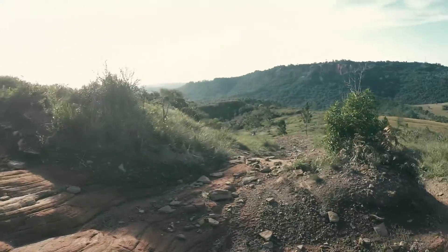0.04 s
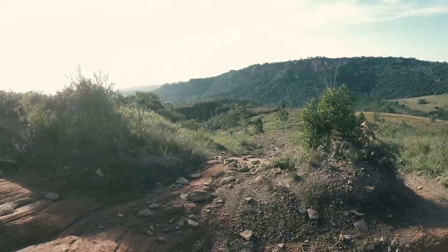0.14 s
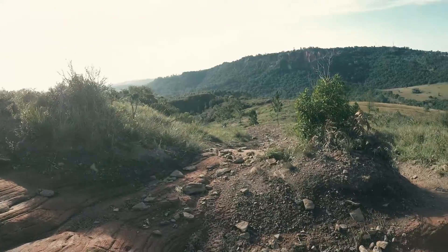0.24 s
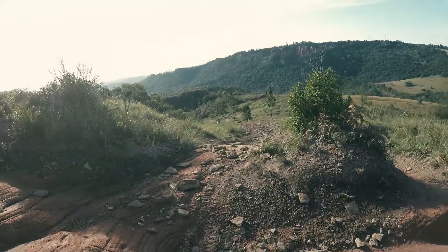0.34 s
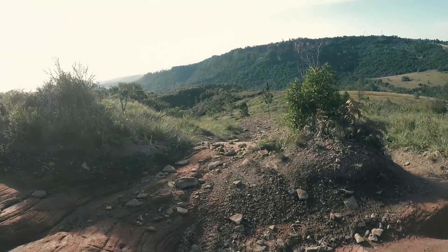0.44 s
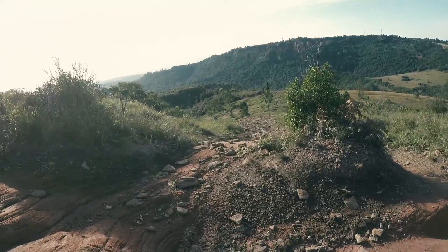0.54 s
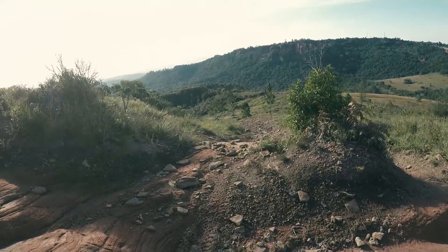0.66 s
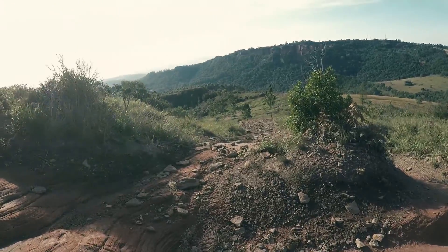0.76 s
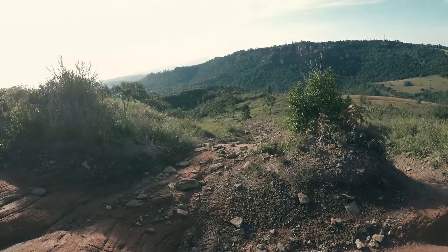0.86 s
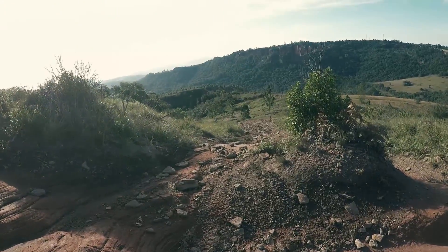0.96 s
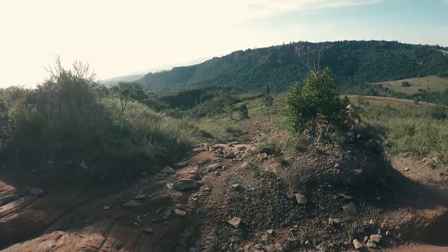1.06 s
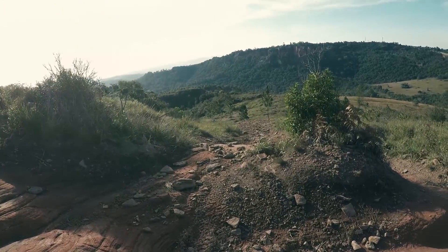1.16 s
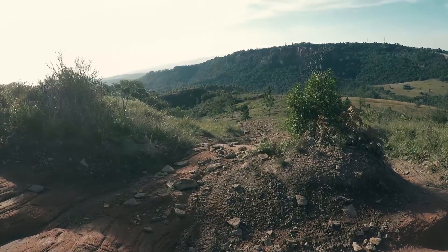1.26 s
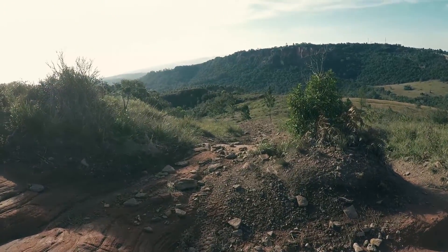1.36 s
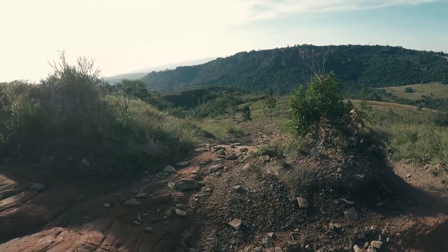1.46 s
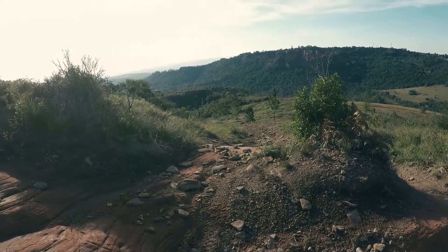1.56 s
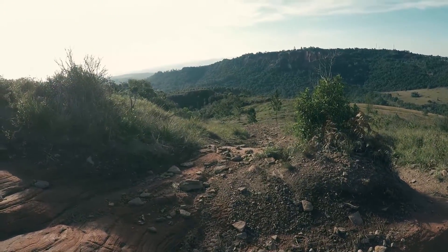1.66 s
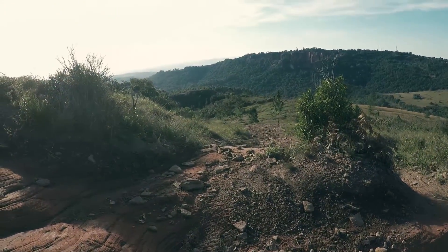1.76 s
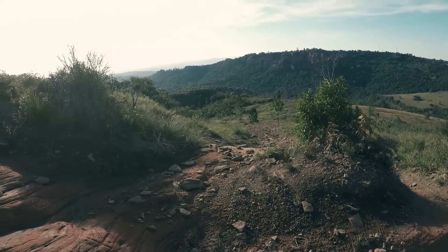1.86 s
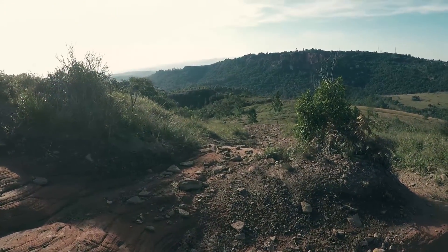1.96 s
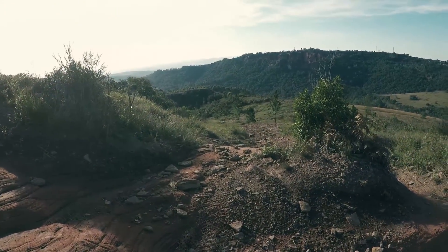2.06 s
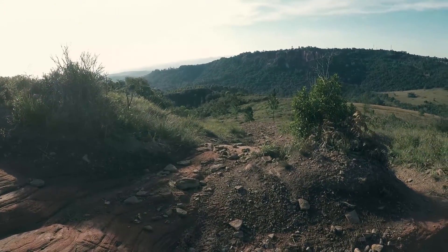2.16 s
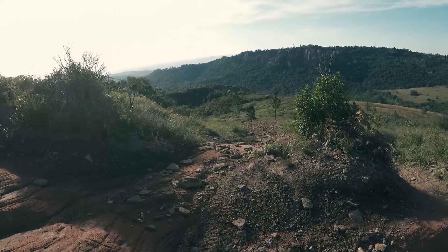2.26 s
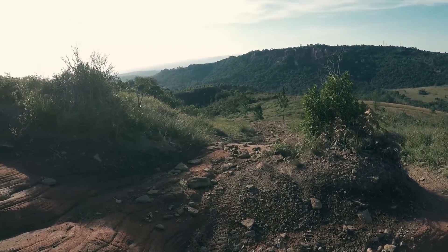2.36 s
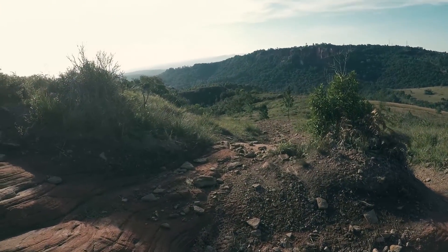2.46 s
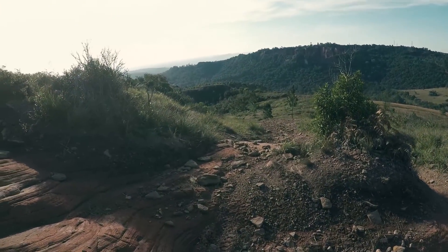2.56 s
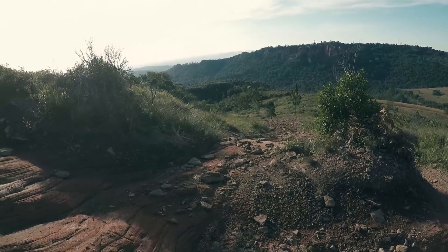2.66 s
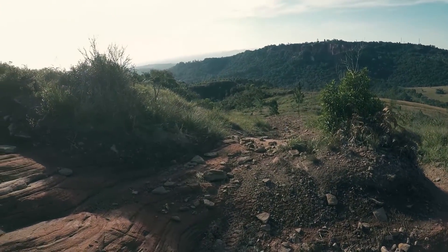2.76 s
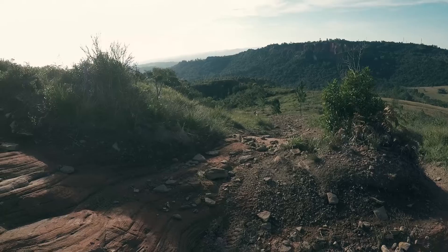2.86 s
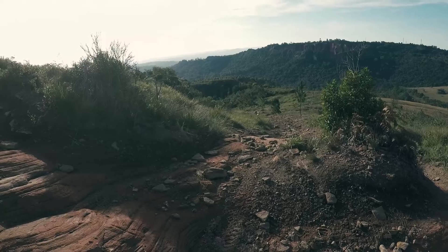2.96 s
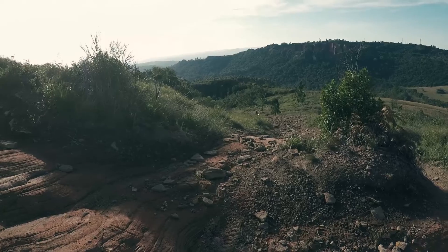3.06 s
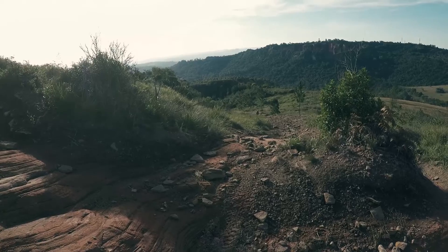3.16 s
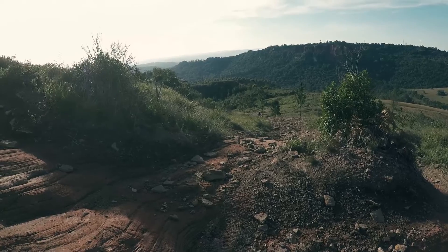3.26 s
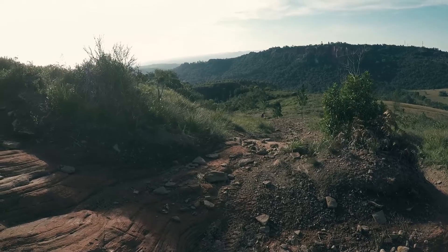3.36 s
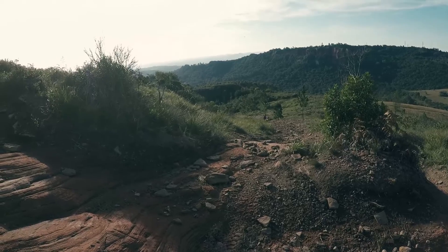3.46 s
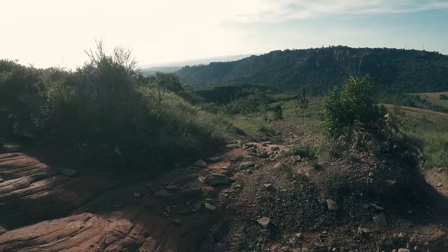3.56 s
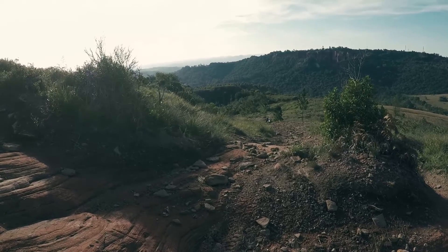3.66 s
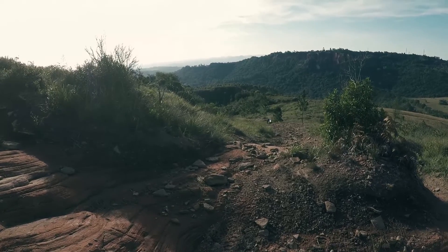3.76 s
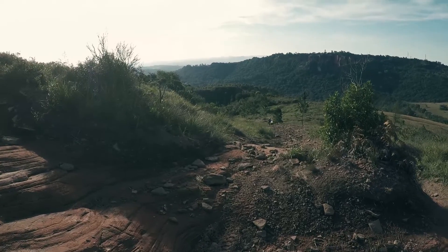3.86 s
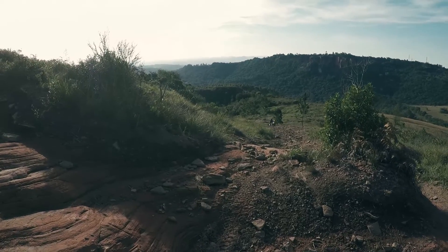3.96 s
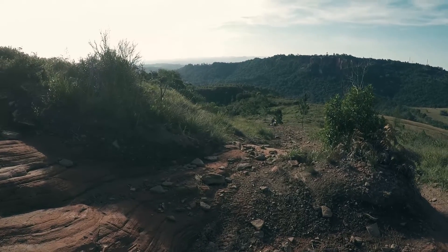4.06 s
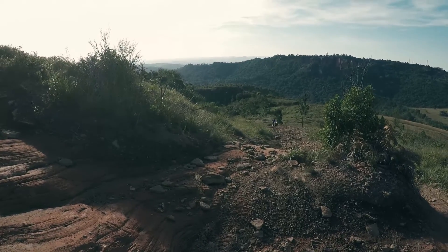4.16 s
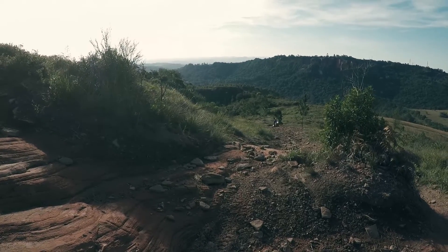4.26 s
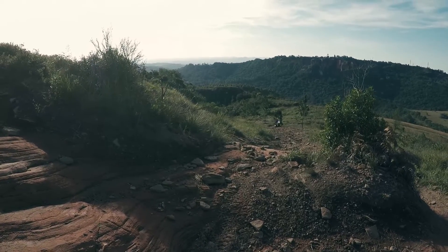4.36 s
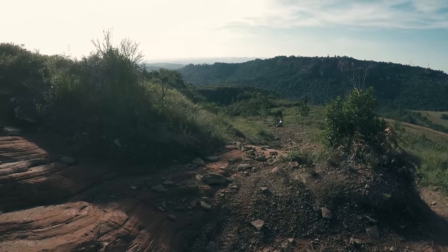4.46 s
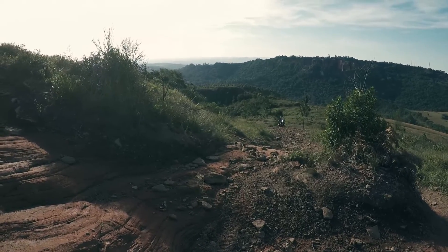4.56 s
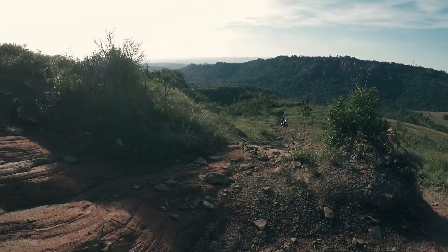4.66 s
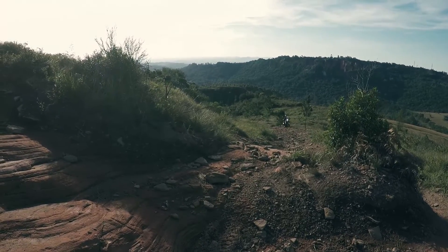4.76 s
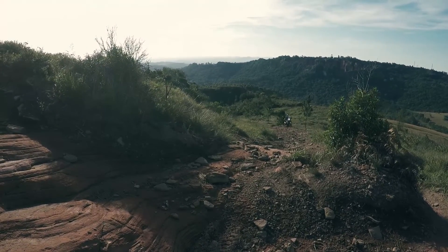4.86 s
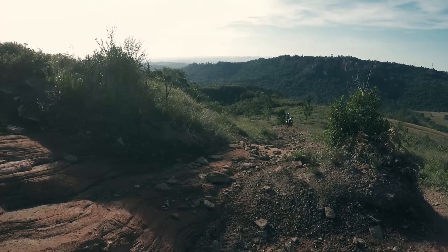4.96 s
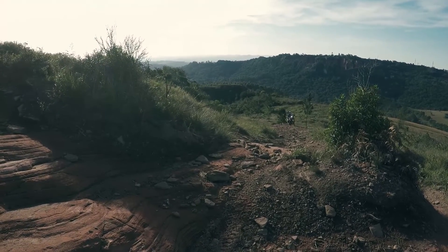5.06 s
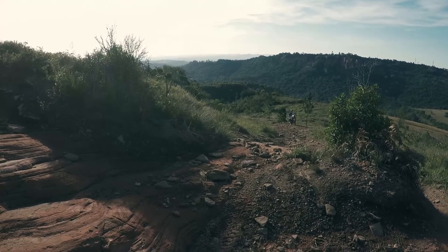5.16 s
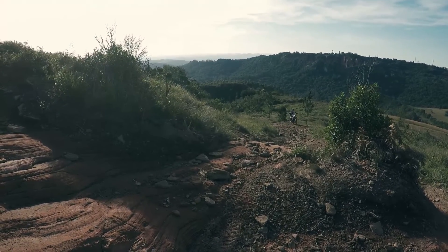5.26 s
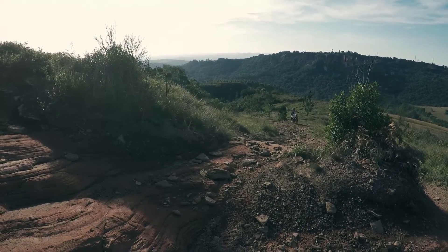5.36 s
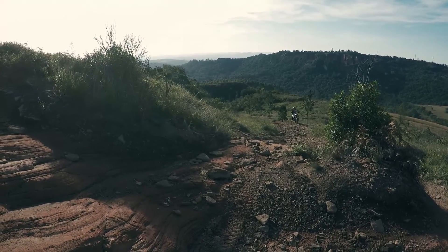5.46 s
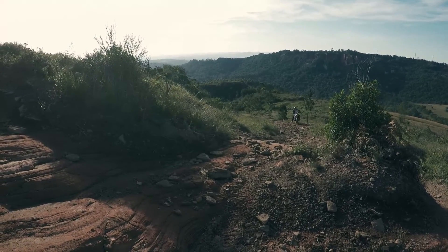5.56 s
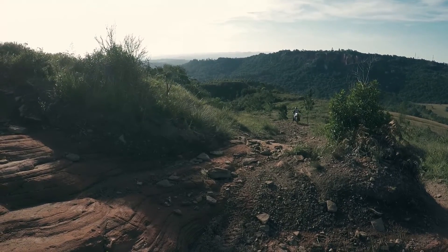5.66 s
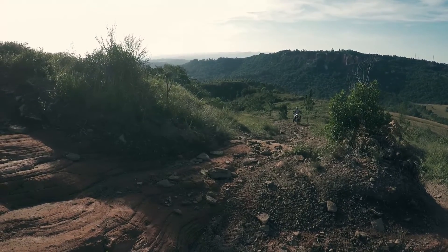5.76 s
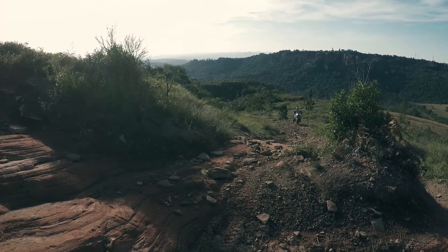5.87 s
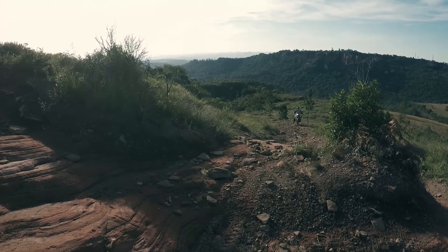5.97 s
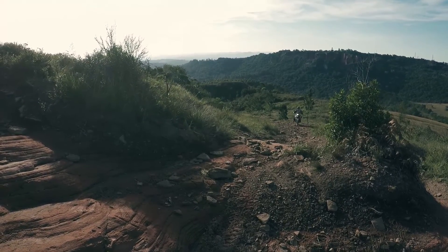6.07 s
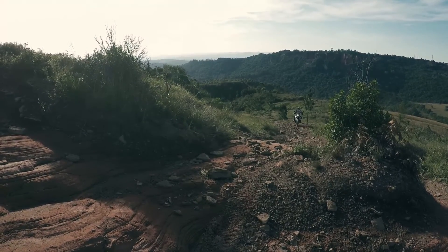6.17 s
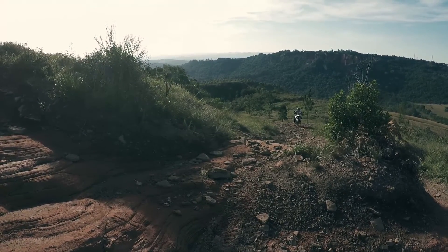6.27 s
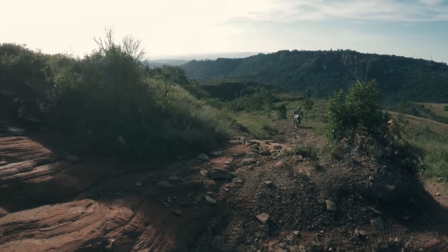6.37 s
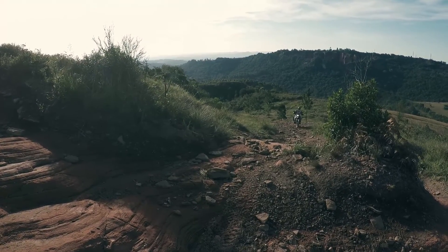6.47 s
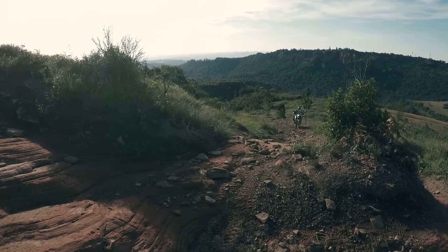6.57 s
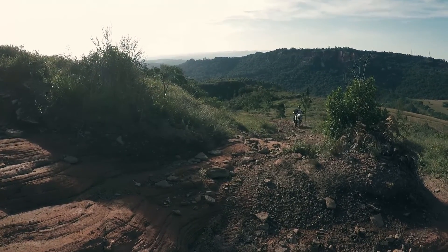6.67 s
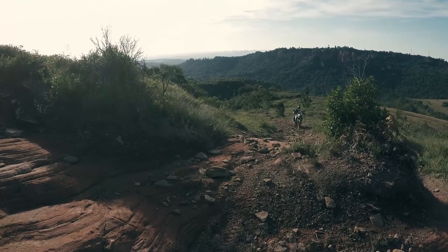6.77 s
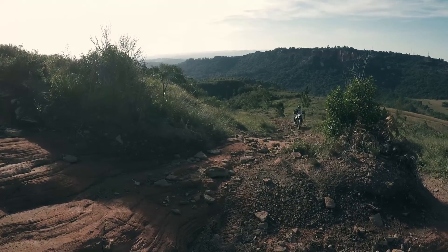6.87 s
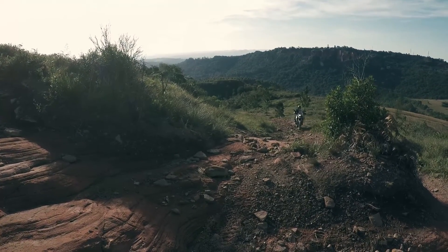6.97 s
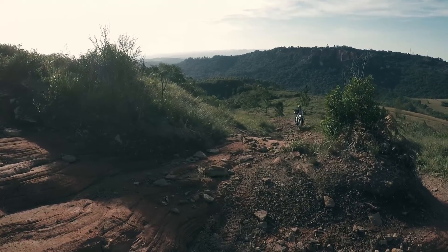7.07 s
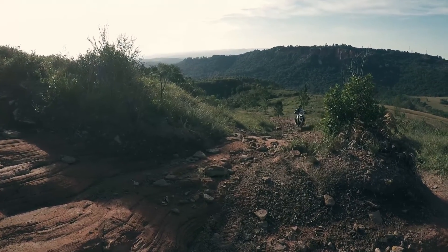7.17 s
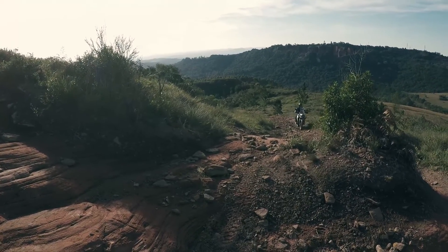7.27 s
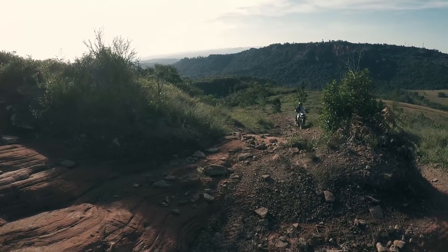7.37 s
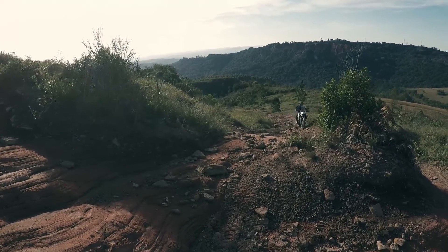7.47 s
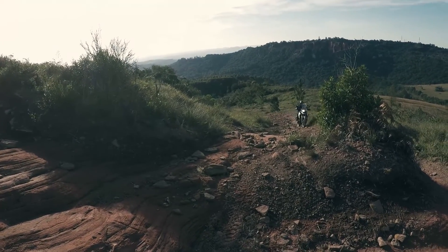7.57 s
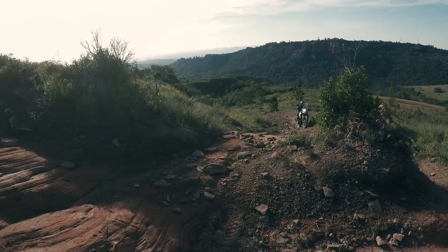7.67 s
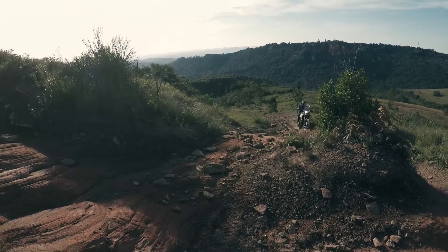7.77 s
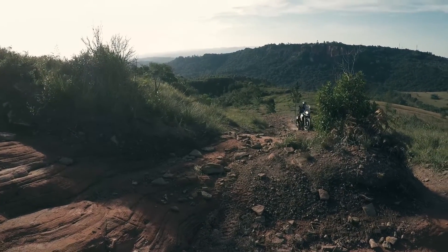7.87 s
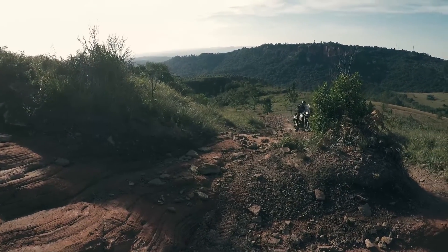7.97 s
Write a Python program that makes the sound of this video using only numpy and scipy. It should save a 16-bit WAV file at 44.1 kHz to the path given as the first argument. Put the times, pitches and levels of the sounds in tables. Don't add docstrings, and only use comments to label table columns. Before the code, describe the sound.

A single-cylinder trail motorcycle thumps up a rocky slope toward the listener, growing louder, with stones clicking and knocking late on.

```python
import sys
import numpy as np
from scipy import signal
from scipy.fft import rfft, irfft, next_fast_len
from scipy.io import wavfile
from scipy.ndimage import uniform_filter1d

SR = 44100
rng = np.random.default_rng(int(sys.argv[2]) if len(sys.argv) > 2 else 0)


def to_wav(sig):
    pcm = np.clip(np.atleast_2d(sig), -1, 1) * 32767
    pcm = np.round(pcm).astype(np.int16)
    wavfile.write(sys.argv[1], SR, pcm.T)


def boost_factor(decibels):
    exponent = np.asarray(decibels, float) / 20
    return 10 ** exponent


N = 353682
PADDED = next_fast_len(N + 2048)
FFT_HZ = np.arange(PADDED // 2 + 1) * SR / PADDED

# (f/Hz, width/Hz, level/dB)
BODY_MODES = [(886, 220, 4), (1272, 160, 4), (1783, 510, 4.5), (3180, 325, 6), (3220, 180, -5.5),
              (3935, 414, 1), (4880, 560, 0), (6150, 494, 1), (7270, 1150, -6.5), (9820, 980, -13),
              (13000, 1500, -31)]


def rms_one(x):
    return x / np.sqrt(np.mean(x ** 2) + 1e-20)


def in_time(rows):
    s, *columns = np.transpose(rows)
    return [np.interp(np.arange(N) / SR, s, c) for c in columns]


def swells(rows):
    s = np.arange(0, N / SR + .002, .001)
    total = sum(height * np.clip(1 - abs(s - t) / half, 0, 1) for t, height, half in rows)
    return np.interp(np.arange(N) / SR, s, total)


def at_hz(points):
    hz, value = np.transpose(points)
    return np.interp(np.log(FFT_HZ + 1), np.log(np.maximum(hz, 0) + 1), value)


def shaped(x, response):
    return irfft(rfft(x, PADDED) * response, PADDED)[..., :N]


def cut(x, hz, kind, order=2):
    return signal.sosfilt(signal.butter(order, hz, kind, fs=SR, output="sos"), x)


def drift(rate_hz):
    slow = cut(rng.standard_normal(N // 50 + 1002), 50 * rate_hz, "low")
    slow = rms_one(slow[1000:])
    return np.interp(np.arange(N) / 50, np.arange(len(slow)), slow)


def resonances(x, modes):
    out = 0
    for hz, width, level_db in modes:
        r = np.exp(-np.pi * width / SR)
        zeros = (1 - r * r) / 2 * np.array([1, 0, -1])
        poles = [1, -2 * r * np.cos(2 * np.pi * hz / SR), r * r]
        out = out + boost_factor(level_db) * signal.lfilter(zeros, poles, x + 1e-18)
    return out


def two_ports(first, second):
    # (f/Hz, likeness [0-1])
    likeness = [(30, 0.81), (150, 0.94), (350, 0.68), (1000, 0.35), (3000, 0.71), (5500, 0.87), (9000, 0),
                (14000, 0.25)]
    alike = np.clip(at_hz(likeness), 0, 1)
    right = shaped([first, second], [alike, np.sqrt(1 - alike ** 2)]).sum(axis=0)
    return np.array([first, right])


def engine_revs():
    # (t/s, rate/firings per s)
    pace = [
        (0.0, 43.4),
        (2.0, 40.4),
        (4.0, 39.6),
        (5.3, 35.1),
        (6.4, 42.2),
        (8.02, 41.7),
    ]
    # (t/s, gain/firings per s, half length/s)
    slips = [(0.25, 3.5, 0.05), (0.69, 3.7, 0.05), (0.89, 6.1, 0.21), (1.01, 3.2, 0.07), (1.35, 3.5, 0.06),
             (1.96, 4.4, 0.11), (2.32, 3.9, 0.09), (2.44, 12.3, 0.22), (2.53, 9.2, 0.07),
             (3.02, 13.2, 0.12), (3.54, 11.2, 0.23), (3.62, 6.1, 0.05), (3.82, 13.4, 0.09),
             (4.07, 4.7, 0.09), (4.28, 30.0, 0.19), (4.54, 7.5, 0.15), (4.86, 8.2, 0.08), (5.01, 4.1, 0.06),
             (5.37, 4.1, 0.06), (5.72, 13.5, 0.2), (6.13, 6.6, 0.16), (6.3, 6.2, 0.07), (6.52, 6.4, 0.08),
             (6.79, 14.9, 0.12), (7.39, 9.2, 0.13), (7.62, 21.0, 0.13), (7.68, 5.3, 0.06),
             (7.92, 11.5, 0.12)]
    # (t/s, change/firings per s, half length/s)
    bites = [(0.4, -2.4, 0.06), (1.17, -4.3, 0.14), (1.41, -4.3, 0.05), (1.78, -6.6, 0.09),
             (2.21, -2.0, 0.19), (2.42, -11.0, 0.06), (2.77, -4.1, 0.1), (3.59, -6.3, 0.05),
             (5.11, -4.1, 0.05), (5.28, -3.3, 0.06), (5.46, -5.8, 0.06), (5.81, -6.2, 0.06),
             (6.04, -11.0, 0.11), (6.8, -10.5, 0.17), (7.05, -4.6, 0.06), (7.33, -10.2, 0.15),
             (7.62, -10.4, 0.05)]
    return in_time(pace)[0] + swells(slips) + swells(bites)


def exhaust(turns, per_s, pulse_db, gas_db):
    # (f/Hz, level of a firing order passing there/dB)
    pipe = [(38, -7), (64, -1), (86, 2), (125, -0.5), (162, 0.5), (192, -13), (228, -6), (330, -28.5)]
    # (f/Hz, width/Hz, level/dB)
    silencer = [(273, 240, 1.5), (326, 97, -2), (466, 103, 3)]
    pipe_hz, pipe_level = np.transpose(pipe)
    turns = turns + .02 * drift(14)
    uneven_db = 1.2 * drift(18)
    thump = 0
    for k in range(1, 11):
        order_db = np.interp(np.log(k * per_s), np.log(pipe_hz), pipe_level)
        gain = boost_factor(order_db + 2.0 * drift(10) + uneven_db)
        waver = .09 * k * drift(8)
        apart = .16 * drift(5) * [[1], [-1]]
        lag = .36 * (k - 3) ** 2
        thump = thump - gain * np.cos(2 * np.pi * k * turns - lag + waver + apart)
    thump = thump / np.sqrt(uniform_filter1d(np.mean(thump ** 2, axis=0), size=SR // 8) + 1e-20)
    puff = np.exp(-.6 * (turns % 1))
    gas = resonances(puff * rng.standard_normal((2, N)), silencer)
    gas = cut(gas, 669, "low", order=4)
    return boost_factor(pulse_db + 1.0) * thump + boost_factor(gas_db - 0.5) * two_ports(*gas / gas.std())


def rattle(turns, level_db):
    ticks_per_s, beat_depth, tick_share = 250, 0.044, 0.31
    beat = 1 + beat_depth * np.cos(2 * np.pi * turns)
    ticks = (rng.random(N) < ticks_per_s / SR) * boost_factor(4.0 * np.minimum(rng.exponential(1, N), 3))
    ticks = signal.lfilter([1], [1, -.97], ticks)
    shake = rng.standard_normal((2, N)) * (beat + tick_share * ticks)
    hiss = 0
    for k, mode in enumerate(BODY_MODES):
        flicker = boost_factor(1.72 * drift(17.8))
        sign = (-1) ** (k - (k > 3))
        ring = resonances(resonances(shake, [mode]), [(mode[0], 4.5 * mode[1], 0)])
        hiss = hiss + flicker * sign * ring
    return boost_factor(level_db - 1.0) * two_ports(*hiss / cut(hiss, [2800, 7000], "band").std())


def gravel():
    # (t/s, peak level/dB, half length/s)
    scrabbles = [(2.17, -49, .07), (2.6, -49, .2), (4.55, -48.5, .25), (4.997, -46, 0.17),
                 (5.732, -40.5, 0.23), (6.205, -40.5, 0.24), (7.05, -50, .12), (7.5, -49, 0.11),
                 (7.703, -37.5, 0.17), (7.928, -36.5, .12)]
    grains_per_s = 320
    grains = (rng.random(N) < grains_per_s / SR) * boost_factor(3.5 * np.minimum(rng.exponential(1, N), 4))
    crunch = rng.standard_normal((2, N)) * (0.3 + signal.lfilter([1], [1, -.985], grains))
    crunch = cut(crunch, [477, 1350], "band")
    level = swells([(t, boost_factor(peak_db), half) for t, peak_db, half in scrabbles])
    return level * two_ports(*crunch / crunch.std())


def contacts():
    # (t/s, peak level/dB, brightest f/Hz)
    grit = [(0.4609, -36, 4170), (1.0856, -38, 3150), (2.334, -31, 6150), (2.437, -35, 5640),
            (2.493, -31, 5700), (2.791, -40, 4570), (3.0061, -33.5, 3720), (5.446, -32, 3250),
            (5.5358, -26.5, 3600), (5.5692, -19, 3800), (5.6186, -29, 3100), (5.6446, -25, 4120),
            (5.9233, -23.5, 3480), (6.725, -29, 3230), (6.787, -29, 3240), (6.8547, -25, 3900),
            (6.8625, -13, 1970), (6.8670, -16, 3800), (6.879, -29, 3880), (6.9013, -20.5, 3200),
            (7.1423, -30, 3180), (7.6643, -17.5, 5740)]
    # (t/s, peak level/dB, brightest f/Hz)
    chips = [(4.2921, -30, 3160), (5.368, -40, 3180), (6.691, -22, 4640), (6.8, -23, 3150),
             (7.3607, -25, 3890), (7.3848, -31, 3180), (7.503, -24.5, 3280), (7.623, -22.5, 5860),
             (7.988, -24.5, 3850)]
    # (t/s, peak level/dB, brightest f/Hz, ring t60/s)
    stones = [(0.6659, -36, 4700, .031), (0.8979, -26.5, 3480, 0.024), (5.6954, -24, 3000, 0.089),
              (5.894, -30.5, 3170, 0.029), (6.2275, -26.5, 3260, 0.051), (6.2957, -31, 3220, 0.019),
              (6.4255, -34, 3080, 0.077), (7.455, -23.5, 3220, .039), (7.4895, -28, 3180, .034),
              (7.5626, -26.5, 3450, 0.025), (7.692, -24, 3150, .058), (7.9022, -19, 3100, 0.038),
              (7.9277, -21, 3020, 0.049)]
    # (t/s, peak level/dB, brightest f/Hz)
    rocks = [(0.0774, -45, 3710), (2.1336, -47, 2540), (2.1895, -46.5, 3780), (2.6396, -40, 2200),
             (5.94, -50, 3080), (6.0384, -40, 3220), (6.1325, -41, 2810), (7.9344, -24.5, 3220)]
    # (t/s, peak level/dB, brightest f/Hz, t60/s, top end/dB, low end/dB)
    snap = (5.5687, -12, 7300, .02, -10, -26)
    return ([(*row, 0.028, -34, -21) for row in grit]
            + [(*row, 0.034, -11, -17.5) for row in chips]
            + [(*row, -17, -8) for row in stones]
            + [(*row, 0.041, -15, 2.5) for row in rocks]
            + [snap])


def clicks():
    hits = contacts()
    s = np.arange(SR // 8) / SR
    for_body, for_top, for_low, bright = np.zeros((4, 2, N))
    noises = np.sign(rng.standard_normal((len(hits), 2, len(s))))
    for (t, peak_db, hz, t60, top_db, low_db), noise in zip(hits, noises):
        i = round(t * SR)
        attack = 1 - np.exp(-s / 0.0006)
        burst = noise * boost_factor(peak_db - 60 * s / np.clip(t60, .005, .2)) * attack
        burst = burst[:, :N - i]
        here = slice(i, i + len(s))
        for_body[:, here] += burst
        for_top[:, here] += burst * boost_factor(top_db)
        for_low[:, here] += burst * boost_factor(low_db)
        own_mode = [(hz, 1300, 0)]
        bright[:, here] += resonances(resonances(burst, own_mode), own_mode)
    body = boost_factor(-0.5) * cut(resonances(for_body, BODY_MODES[3:]), 8160, "low", order=4)
    top = boost_factor(6.0) * cut(for_top, [6300, 9900], "band", order=3)
    low = boost_factor(16.0) * cut(for_low, [600, 2100], "band")
    return two_ports(*(body + top + low + boost_factor(5.5) * bright))


def knocks():
    # (t/s, peak level/dB, pitch f/Hz, t60/s)
    thuds = [(0.626, -32.5, 304, 0.12), (1.956, -45, 377, 0.051), (2.134, -23.5, 750, 0.04),
             (2.149, -29, 437, 0.03), (2.191, -30, 900, 0.03), (2.194, -29, 556, 0.06),
             (2.207, -41, 355, 0.043), (2.64, -21.5, 470, 0.025), (2.673, -31, 380, 0.036),
             (4.058, -57, 345, 0.06), (5.569, -18, 502, 0.042), (5.67, -39, 447, 0.073),
             (6.14, -27.5, 458, 0.085), (7.149, -21.5, 560, 0.049), (7.28, -32, 470, 0.025),
             (7.456, -15.5, 583, 0.04), (7.485, -19.5, 534, 0.06), (7.836, -21, 443, 0.036),
             (7.901, -13, 1033, 0.041), (7.928, -9.5, 553, 0.065), (7.932, -12, 286, 0.06),
             (7.953, -21, 1150, 0.03)]
    out, s = np.zeros(N), np.arange(SR // 6) / SR
    for (t, peak_db, hz, t60), noise in zip(thuds, rng.standard_normal((len(thuds), len(s)))):
        i = round(t * SR)
        ring = np.sin(2 * np.pi * hz * s) + 0.3 * np.sin(2 * np.pi * 0.593 * hz * s)
        ring = ring * boost_factor(-60 * s / np.clip(t60, .01, .3)) * (1 - np.exp(-s / 0.00072))
        crack = cut(noise * boost_factor(-60 * s / 0.0053), [500, 1600], "band")
        out[i:i + len(s)] += (boost_factor(peak_db + 0.5) * (ring + crack))[:N - i]
    return out


def wind():
    # (t/s, peak level/dB, half length/s)
    gusts = [(0.0, -20, 0.069), (0.28, -24.5, 0.2), (0.586, -24, 0.1), (0.882, -27.5, 0.14),
             (1.24, -26, 0.2), (1.59, -25.5, 0.19), (1.933, -27, 0.12), (2.308, -29.5, .08),
             (2.455, -29.5, 0.2), (3.044, -25, 0.069), (3.294, -26.5, 0.087), (3.425, -28, 0.085),
             (3.63, -24.5, 0.089), (3.977, -25, .05), (4.077, -25, 0.054), (4.244, -29, 0.1),
             (4.62, -29, 0.071), (4.98, -30, 0.063), (5.185, -32.5, .07), (5.32, -26.5, 0.058),
             (5.706, -25, 0.1), (5.87, -29, 0.053), (6.056, -27, .14), (6.475, -26.5, 0.098),
             (6.682, -26.5, .12), (6.88, -26, .06), (7.13, -31, .12), (7.474, -27, .09), (7.7, -20, 0.14),
             (7.95, -18, .12)]
    lull_db = -37
    level_db = lull_db + swells([(t, peak_db - lull_db, half) for t, peak_db, half in gusts])
    lumps = cut(rng.standard_normal((2, N + SR)), [23, 42], "band")
    lumps = cut(lumps, 67, "low")[:, SR:]
    lumps = lumps / np.sqrt(uniform_filter1d(lumps ** 2, size=SR // 14) + 0.072 * lumps.var())
    return boost_factor(level_db - 0.5) * two_ports(*lumps / lumps.std())


def hillside():
    # (f/Hz, level per Hz/dB)
    colour = [(290, -27), (500, 5.5), (1080, -1), (1490, -1.5), (2500, -16.5), (5730, -13), (12200, -21.5),
              (14800, -33)]
    air = shaped(rng.standard_normal((2, N)), boost_factor(at_hz(colour)))
    air = cut(air, 674, "high", order=4)
    return boost_factor(-51) * two_ports(*air / air.std())


def scene():
    # (t/s, exhaust level/dB, chain and tyre level on loose ground/dB)
    climb = [(0.0, -35, -53), (0.45, -36, -52), (0.9, -33.5, -50.5), (1.2, -37, -56.5), (1.7, -32, -51.5),
             (2.15, -36, -55), (2.5, -33, -48), (3.25, -33.5, -51.5), (3.9, -29.5, -52), (4.3, -32, -49),
             (4.7, -31, -45.5), (5.1, -32, -44), (5.5, -27.5, -42), (6.0, -27, -42), (6.5, -26.5, -43),
             (7.3, -25, -41), (7.7, -21.5, -38.5), (8.02, -20.5, -36.5)]
    per_s = engine_revs()
    turns = np.cumsum(per_s) / SR
    octaves = np.log2(per_s / 42)
    near_db, ground_db = in_time(climb)
    pulse_db = near_db + 2.5 * octaves
    rattle_db = ground_db + 7 * octaves
    gas_db = near_db.mean() + 0.8 * (near_db - near_db.mean()) - 11.5 + 4.5 * octaves
    machine = exhaust(turns, per_s, pulse_db, gas_db) + rattle(turns, rattle_db)
    ground = gravel() + clicks() + knocks()
    return machine + ground + wind() + hillside()


def top_cut(x):
    return signal.sosfilt(signal.butter(12, 14970, fs=SR, output="sos"), x)


def record(dry):
    # (f/Hz, left lead/rad)
    port_phase = [(340, 0.1), (760, -2.9), (950, -3.8), (2000, -6.4), (4910, -6.2), (5510, -12.8),
                  (6980, -12.5), (9130, -3.2)]
    # (f/Hz, left minus right/dB)
    port_balance = [(60, -1.5), (150, 1.3), (370, 2.5), (680, 0.7), (1400, 1), (2800, -2), (5500, 1.9),
                    (10000, -4.5)]
    left = boost_factor(at_hz(port_balance) / 2) * (FFT_HZ < 14950)
    right = np.exp(-1j * at_hz(port_phase)) * (left > 0) / (left + 1e-9)
    to_edge = np.minimum(np.arange(N), N - 1 - np.arange(N))
    fade = np.sin(np.pi / 2 * np.clip(to_edge / (.004 * SR), 0, 1)) ** 2
    return top_cut(shaped(dry * fade, [left, right]))


dry = scene()
out = record(dry)
to_wav(out)
```